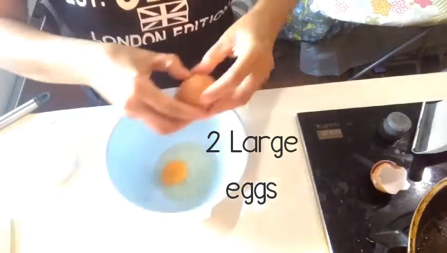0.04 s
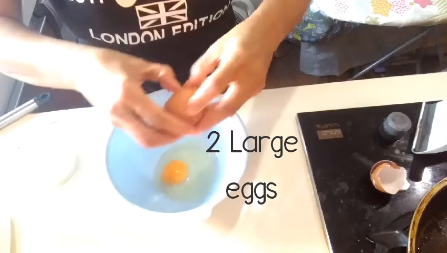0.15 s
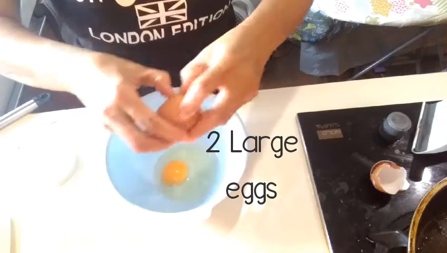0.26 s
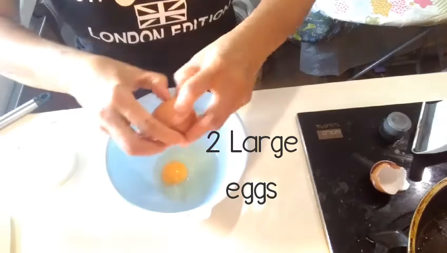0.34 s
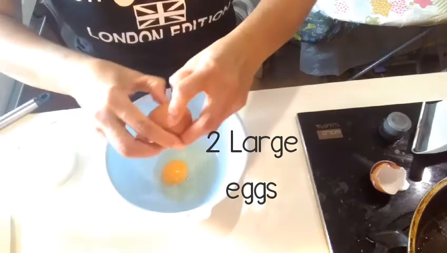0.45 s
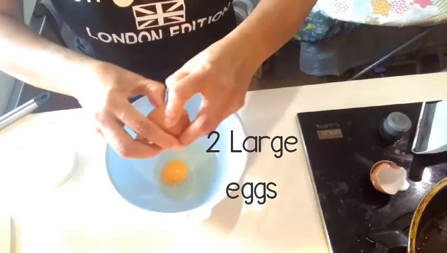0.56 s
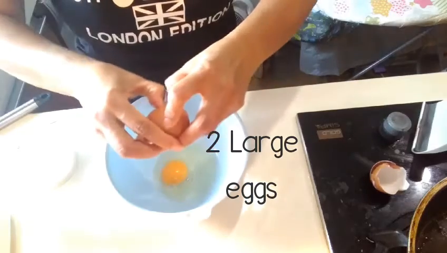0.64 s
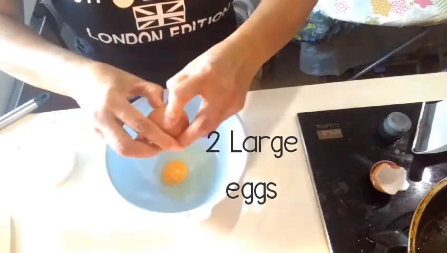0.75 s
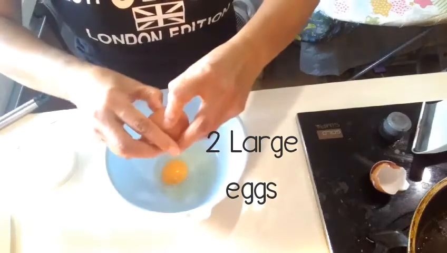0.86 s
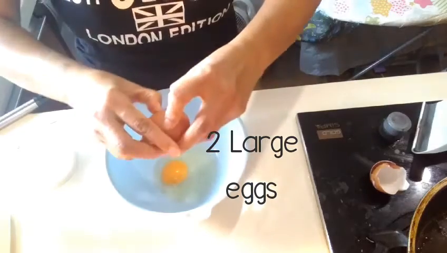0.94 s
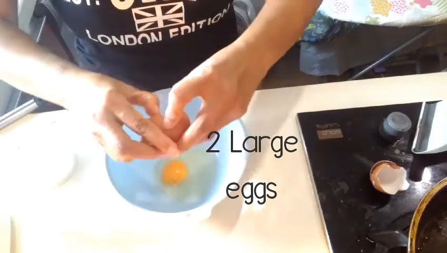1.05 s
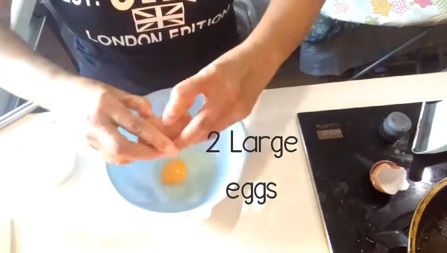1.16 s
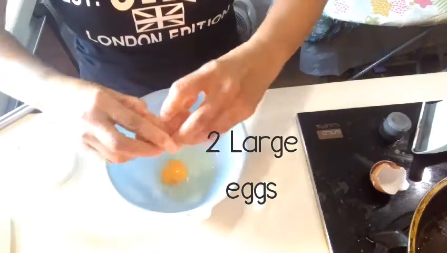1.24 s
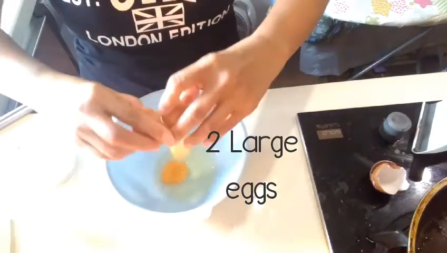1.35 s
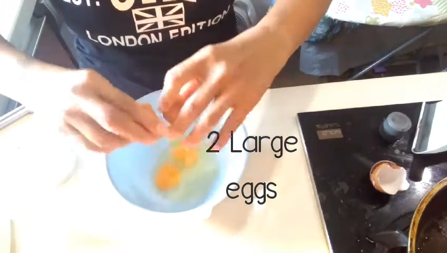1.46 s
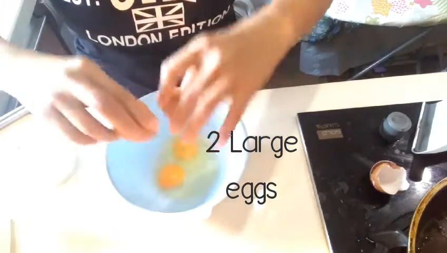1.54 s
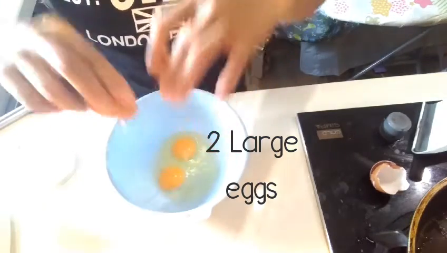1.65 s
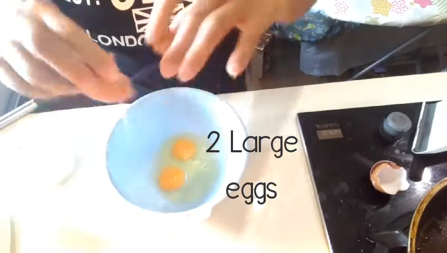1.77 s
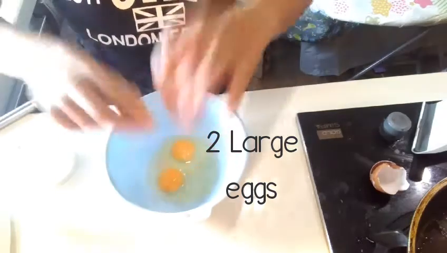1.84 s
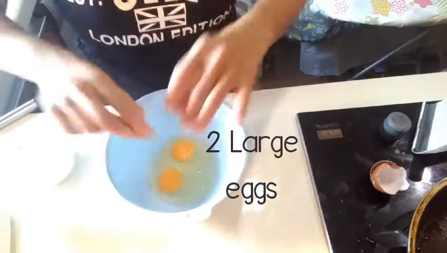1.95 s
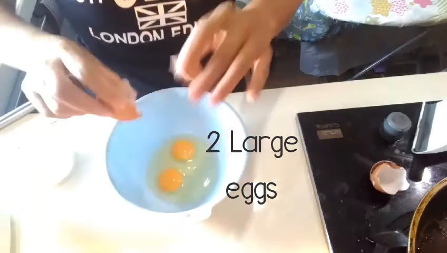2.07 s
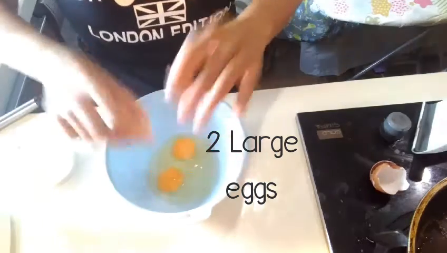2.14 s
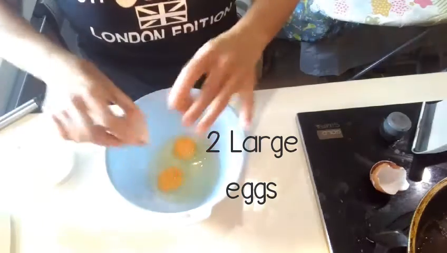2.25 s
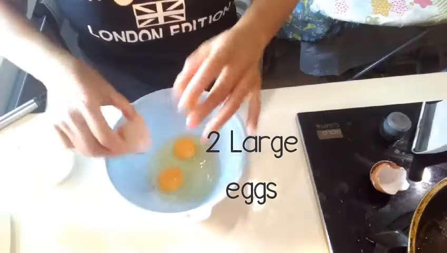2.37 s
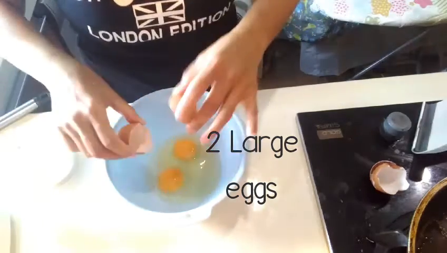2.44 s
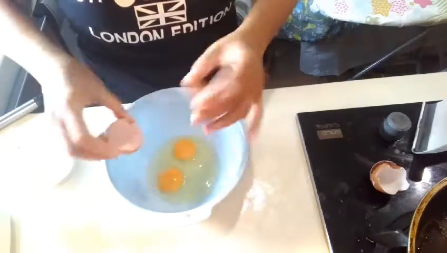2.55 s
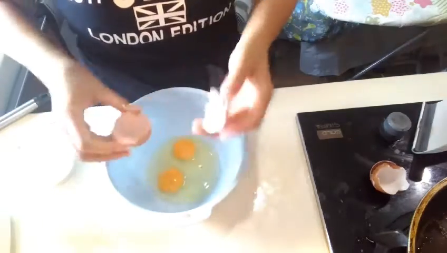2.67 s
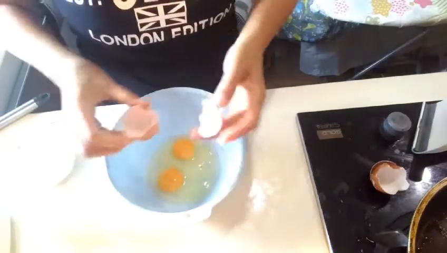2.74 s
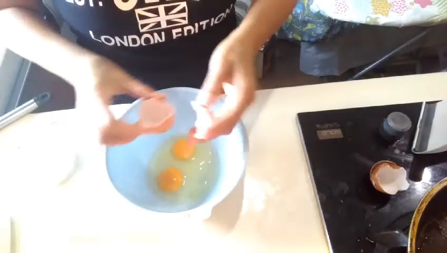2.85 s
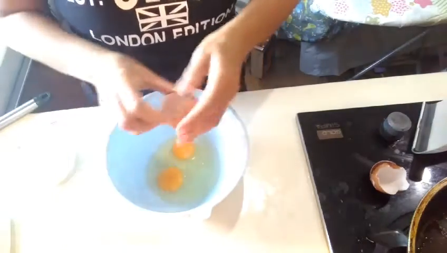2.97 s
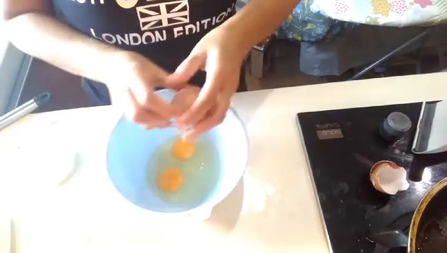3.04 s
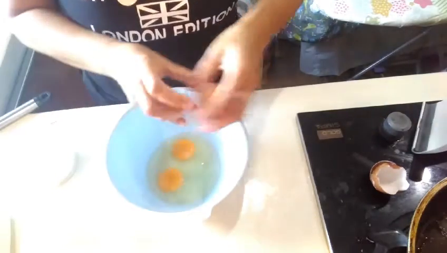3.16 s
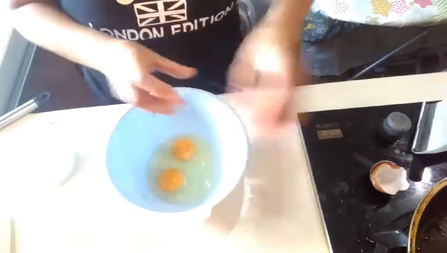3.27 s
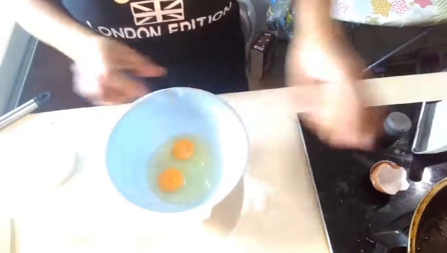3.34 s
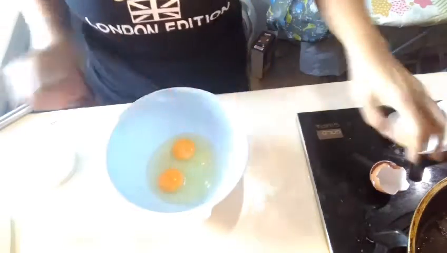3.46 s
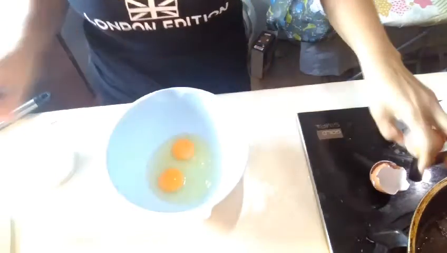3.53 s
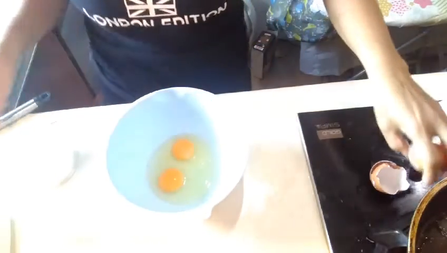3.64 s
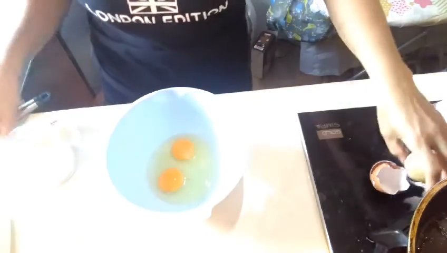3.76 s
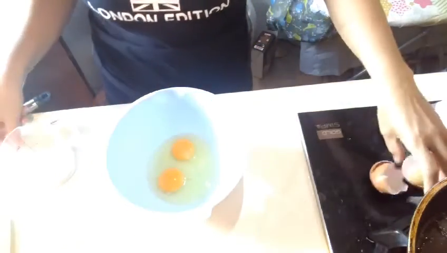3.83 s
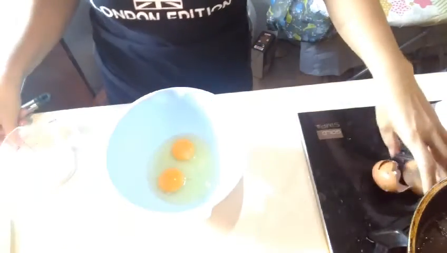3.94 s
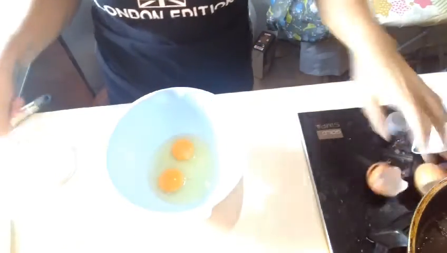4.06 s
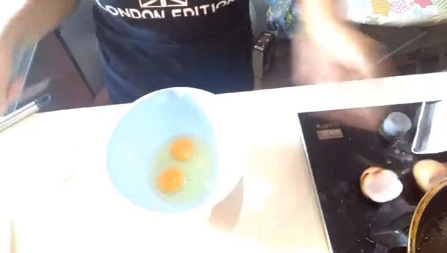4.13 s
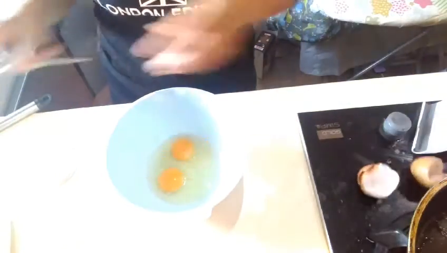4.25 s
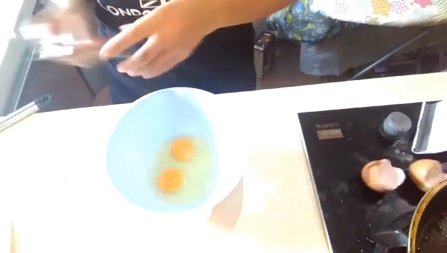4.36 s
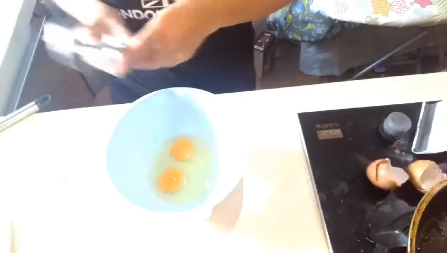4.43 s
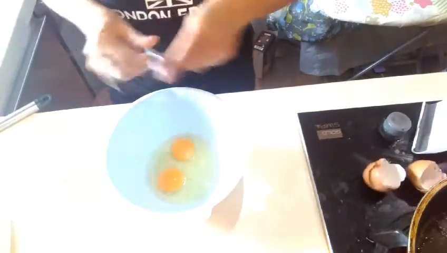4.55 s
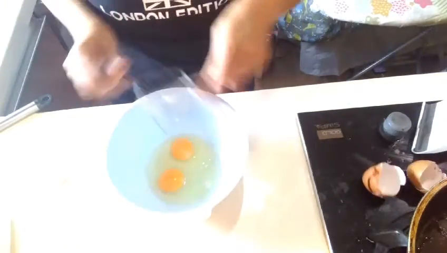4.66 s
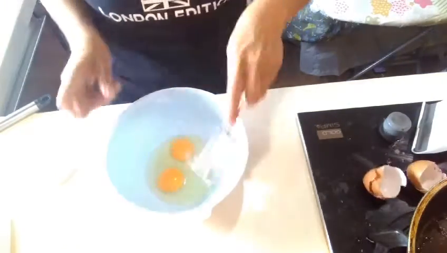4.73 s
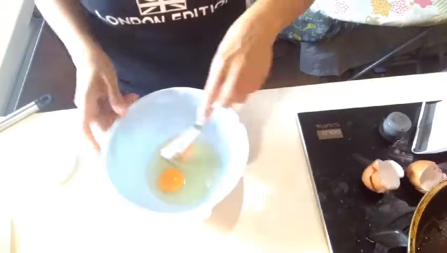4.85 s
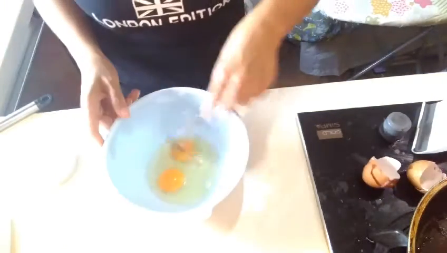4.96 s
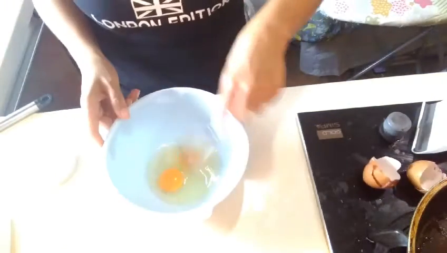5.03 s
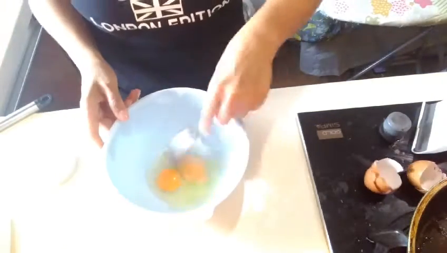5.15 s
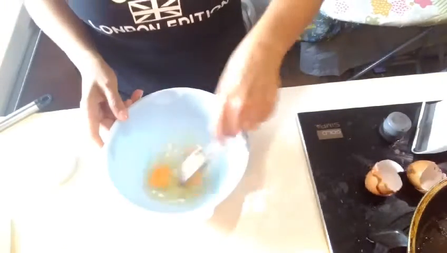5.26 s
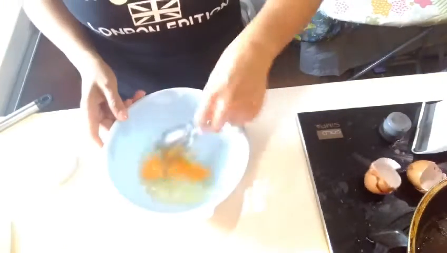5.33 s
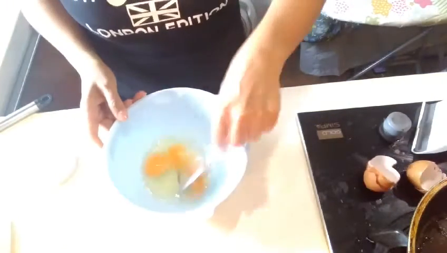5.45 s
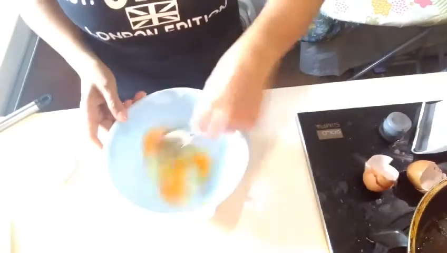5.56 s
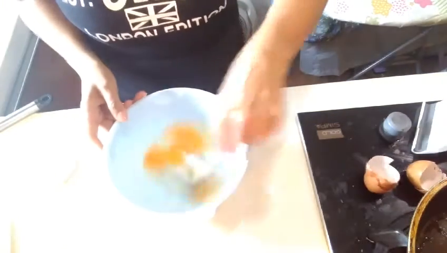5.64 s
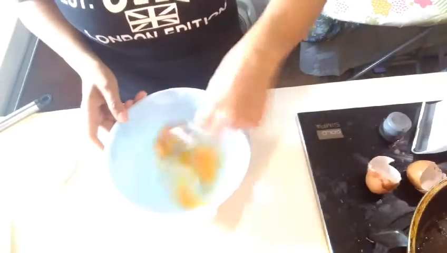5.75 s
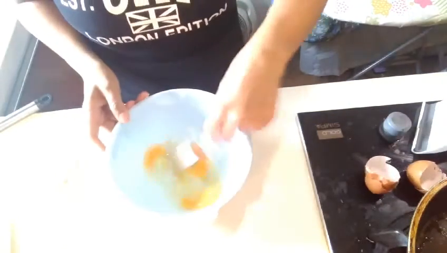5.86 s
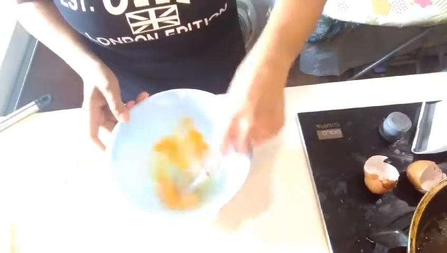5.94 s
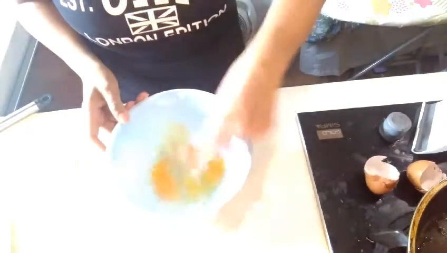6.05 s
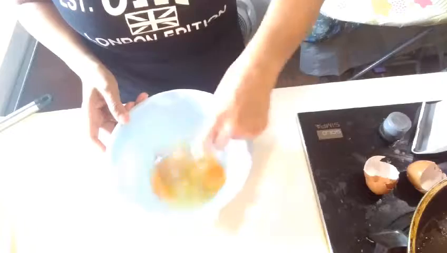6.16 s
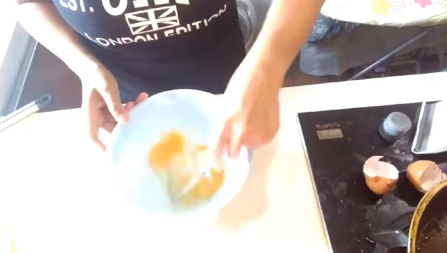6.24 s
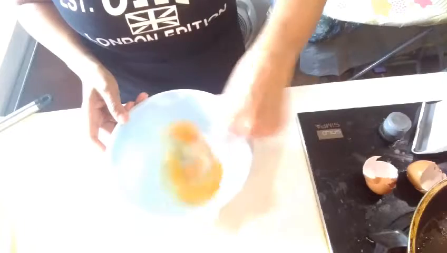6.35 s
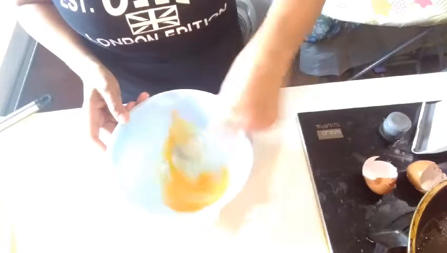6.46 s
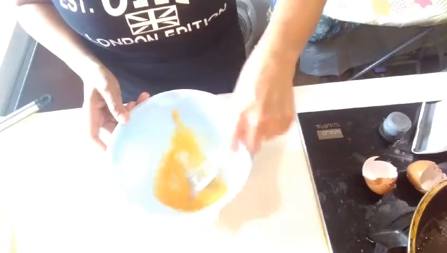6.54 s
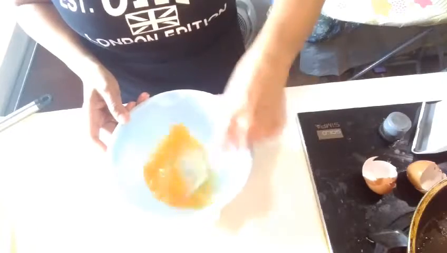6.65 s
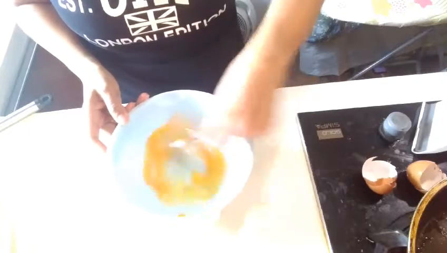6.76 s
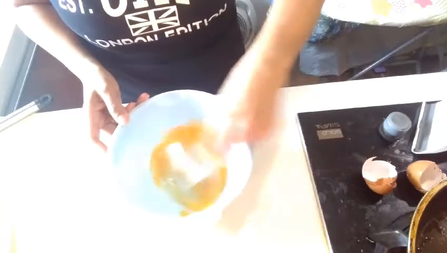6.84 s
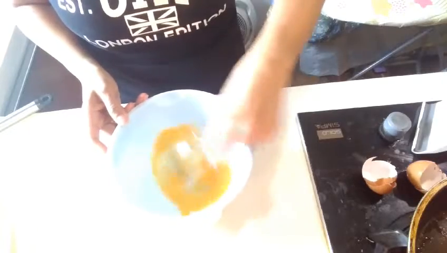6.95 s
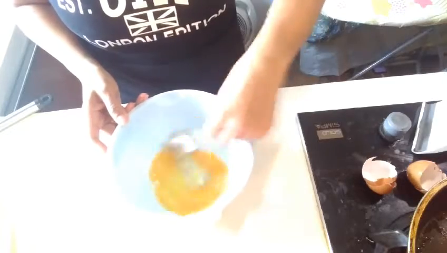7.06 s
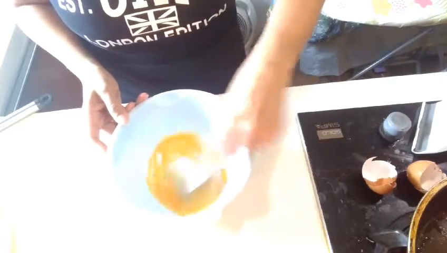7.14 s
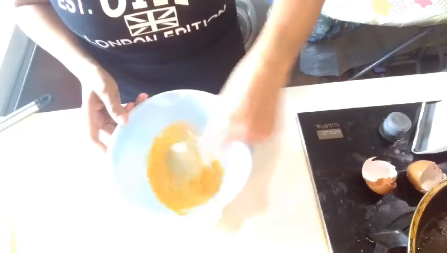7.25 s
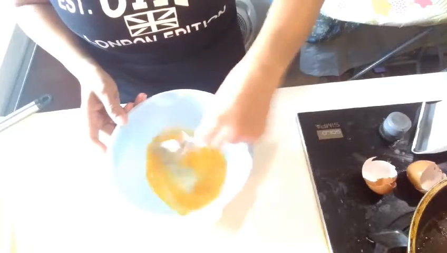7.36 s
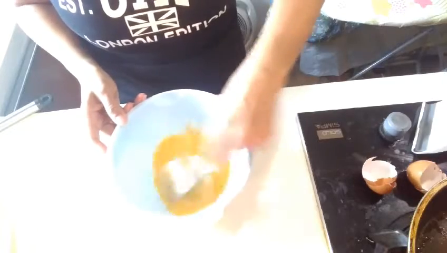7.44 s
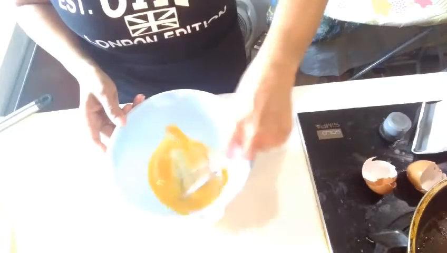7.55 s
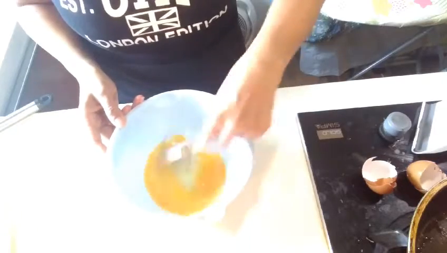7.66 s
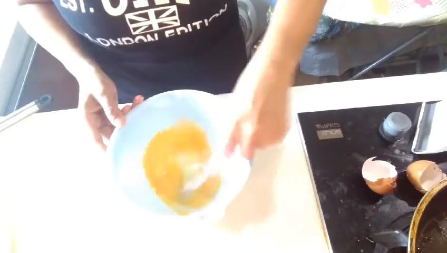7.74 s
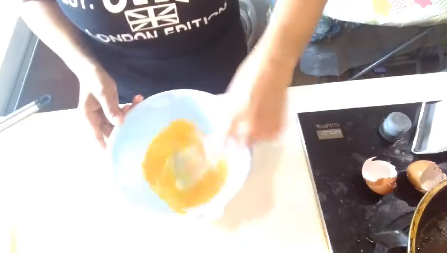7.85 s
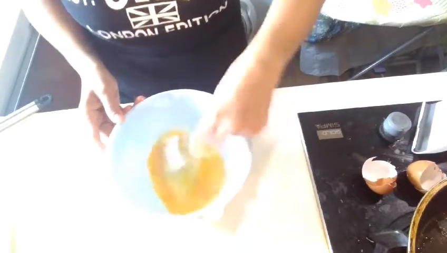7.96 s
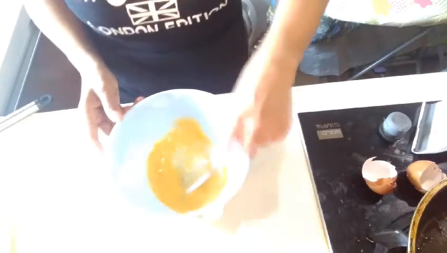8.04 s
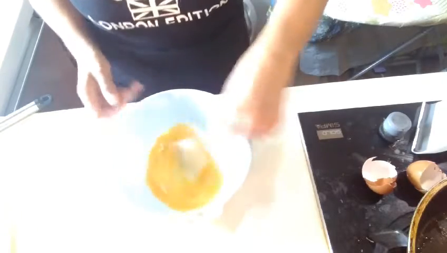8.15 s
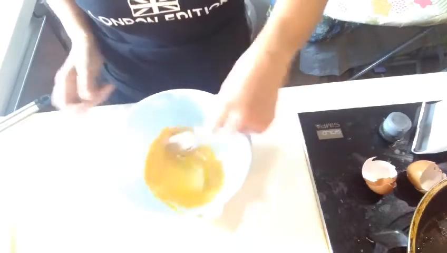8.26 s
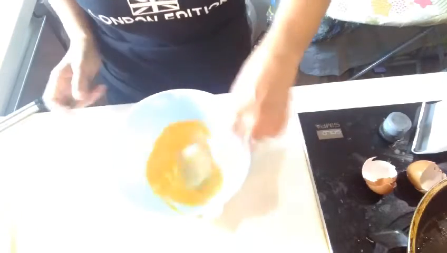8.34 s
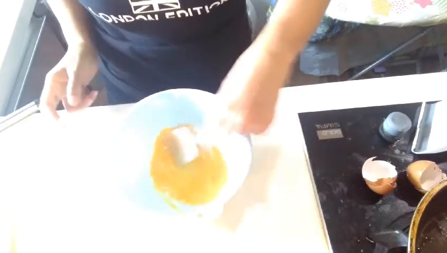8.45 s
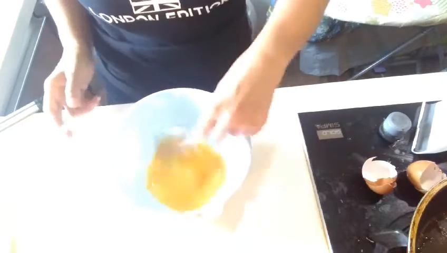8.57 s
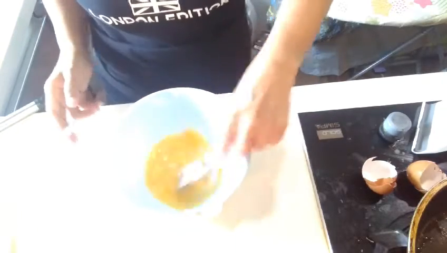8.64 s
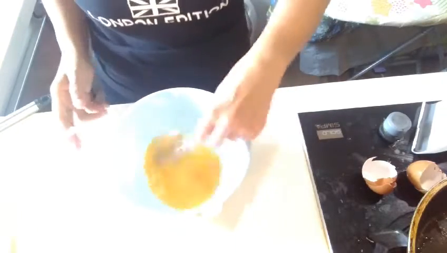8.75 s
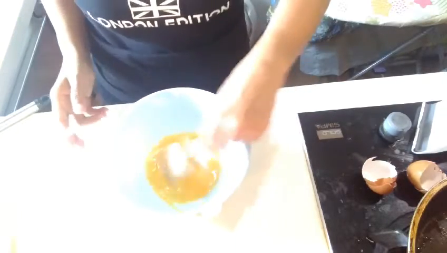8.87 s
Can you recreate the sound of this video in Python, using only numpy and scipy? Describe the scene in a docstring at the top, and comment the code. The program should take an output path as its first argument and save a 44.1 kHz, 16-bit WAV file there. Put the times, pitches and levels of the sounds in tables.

```python
"""A small kitchen, one microphone close to a plastic bowl, a fan humming far off throughout.
Half a second in, an egg cracks against the bowl; the shell is pulled apart in brittle snaps while fingers
rub on it and the sticky white pops. At five seconds something hollow clicks down on the counter and rings.
From six seconds on a fork beats the eggs, striking and scraping the bowl and stirring in small bubbles."""
import sys
import numpy as np
from scipy import signal
from scipy.fft import rfft, irfft
from scipy.io import wavfile
from scipy.ndimage import uniform_filter1d

SR = 44100
rng = np.random.default_rng(int(sys.argv[2]) if len(sys.argv) > 2 else 0)


def log_audio(samples):
    """Write samples as a 16-bit WAV file to the path given in sys.argv[1]."""
    # one column per channel
    frames = np.atleast_2d(samples).T
    # limit to full scale, then quantise
    limited = np.clip(frames, -1, 1)
    pcm = np.round(limited * 32767).astype(np.int16)
    wavfile.write(sys.argv[1], SR, pcm)


N = 392490

# The bowl's low and high modes. Each row: frequency in Hz, width in Hz, gain in dB.
BOWL_LOW = [(108.3, 10, -4.5), (176, 44, -3.5), (274, 38, -3.5), (357, 42, -2), (531, 28, -5),
            (696, 73, -1.5), (827.5, 50, 0.6)]
BOWL_HIGH = [(1095, 56, -0.5), (1397, 61, -7.5), (1586, 67, 2), (1990, 560, -4.5), (2417, 240, 1.5),
             (2656, 198, 7), (3146, 147, 5.5), (3830, 130, -2.5), (4287, 140, -3.5), (4720, 470, -17.5),
             (5550, 240, -13.5), (6570, 5100, -34)]
# The fork hits the bowl. Each row: start in seconds, then levels in dB of the high modes,
# the lowest modes, the middle modes and the tick.
FORK_HITS = [(6.123, -21.5, -39, -27.5, -31), (6.1527, -40, -36.5, -33, -58), (6.2694, -42, -56, -47, -65),
             (6.2846, -30, -46, -40.5, -49), (6.392, -35, -57, -52, -52), (6.4674, -36, -57, -50, -50),
             (6.4811, -35, -61, -56, -28.5), (6.568, -30, -56, -58, -53), (6.6712, -31, -42, -44, -54),
             (6.7287, -38, -43, -45, -52), (6.7861, -32.5, -61, -47, -49), (6.9005, -33, -50, -53, -34.5),
             (6.9239, -21, -26.5, -28, -36), (6.977, -31, -36, -30.5, -30), (7.0267, -27, -26, -22.5, -40),
             (7.07, -31, -49, -26.5, -44), (7.125, -25.5, -34, -39, -50), (7.1649, -39, -50, -43, -34),
             (7.2196, -31, -32.5, -31, -43), (7.2664, -26, -56, -44, -39), (7.296, -21, -42, -26.5, -49),
             (7.3353, -25, -31, -33, -43), (7.4068, -29, -31, -32, -44), (7.5013, -28, -44, -37, -40),
             (7.5647, -25, -58, -60, -44), (7.6065, -25.5, -29.5, -30.5, -52), (7.64, -29, -37, -33, -43),
             (7.7038, -25.5, -37.5, -39, -49), (7.7747, -32, -52, -58, -39), (7.8302, -34, -36, -43, -60),
             (7.8478, -43, -52, -56, -50), (7.8979, -21, -34.5, -26.5, -34), (7.9628, -38, -46, -45, -27),
             (7.9918, -22, -31.5, -28, -36), (8.0524, -19.5, -36, -28, -38), (8.0992, -18.5, -36, -27, -38),
             (8.1403, -23, -36.5, -45, -48), (8.199, -30, -32.5, -28.5, -37),
             (8.3072, -33, -51, -39.5, -56), (8.3454, -21.5, -44, -34.5, -32), (8.428, -41, -37, -41, -54),
             (8.45, -32, -46, -43, -48), (8.5061, -23, -34, -28.5, -30), (8.5485, -34, -37.5, -31.5, -54),
             (8.6269, -28.5, -32, -31.5, -45), (8.6551, -27.5, -29.5, -35, -45),
             (8.6903, -34, -42, -38, -47), (8.772, -33.5, -63, -58, -54), (8.852, -38, -38, -40, -49),
             (8.8702, -36, -45, -39.5, -54)]
# The tines sweep through the egg. Each row: middle and half length in seconds, then levels in dB
# of scrape, squelch and splash.
FORK_SWEEPS = [(6.153, 0.03, -48, -61, -70), (6.311, 0.03, -39.5, -56, -63),
               (6.394, 0.033, -50, -62, -62.5), (6.508, 0.038, -45.5, -53.5, -63),
               (6.598, 0.028, -42, -54, -53), (6.689, 0.034, -47, -54, -65),
               (6.747, 0.031, -54.5, -65, -73), (6.807, 0.029, -45.5, -44.5, -55.5),
               (6.854, 0.0094, -53, -66, -54.5), (6.939, 0.026, -42, -60, -65),
               (6.996, 0.028, -40.5, -42.5, -49), (7.041, 0.019, -40, -50, -63),
               (7.083, 0.021, -43, -48, -67), (7.135, 0.016, -39.5, -46.5, -68),
               (7.188, 0.04, -40.5, -54, -48.5), (7.263, 0.03, -42, -47, -51.5),
               (7.308, 0.018, -34.5, -52, -71), (7.358, 0.029, -39, -47, -51.5),
               (7.412, 0.043, -40, -65, -53), (7.46, 0.028, -48.5, -52, -51), (7.516, 0.027, -44, -61, -61),
               (7.57, 0.02, -45.5, -56, -63), (7.618, 0.013, -43, -56, -64), (7.652, 0.018, -40, -58, -54),
               (7.713, 0.03, -42.5, -54, -69), (7.773, 0.025, -44, -60, -60),
               (7.853, 0.016, -44.5, -52, -60), (7.915, 0.031, -42, -57, -58),
               (7.973, 0.035, -41.5, -54, -50.5), (8.062, 0.018, -44.5, -57, -60),
               (8.113, 0.017, -39.5, -48, -60), (8.156, 0.031, -41, -40, -49),
               (8.21, 0.022, -46.5, -54, -57), (8.252, 0.027, -46, -53, -65), (8.312, 0.015, -45, -69, -77),
               (8.367, 0.038, -40.5, -53.5, -52.5), (8.461, 0.023, -42.5, -51, -55),
               (8.519, 0.02, -39, -62, -58), (8.576, 0.027, -39.5, -47, -54),
               (8.66, 0.021, -42.5, -60, -63), (8.701, 0.035, -39.5, -48, -54.5),
               (8.796, 0.033, -42, -53, -55), (8.879, 0.021, -44, -54, -65)]
SWEEP_RISE = .7   # rise time as a share of the fall


def from_db(db):
    """Decibels to gain."""
    return 10 ** (np.asarray(db) / 20)


def unit_rms(x):
    """Scale to rms 1."""
    return x / np.sqrt(np.mean(x ** 2) + 1e-20)


def level_curve(rows, outside_db=None):
    """A gain for every sample, from rows of seconds and dB."""
    times, db = np.transpose(rows)
    return from_db(np.interp(np.arange(N) / SR, times, db, left=outside_db, right=outside_db))


def drift(per_s):
    """A slow random curve through points of spread 1."""
    return np.interp(np.arange(N) * per_s / SR, np.arange(900), rng.standard_normal(900))


def coloured(spectrum):
    """Smooth noise of rms 1, shaped by rows of Hz and dB."""
    points_hz, points_db = np.transpose(spectrum)
    hz = np.maximum(np.arange(N // 2 + 1) * SR / N, 1)
    shape = from_db(np.interp(np.log(hz), np.log(points_hz), points_db))
    return unit_rms(irfft(rfft(rng.standard_normal(N)) * shape, N))


def highpass(x, edge_hz):
    """Second-order high-pass."""
    return signal.sosfilt(signal.butter(2, edge_hz, "high", fs=SR, output="sos"), x)


def resonate(x, hz, width_hz):
    """Two-pole resonance, gain 1 at its peak."""
    r = np.exp(-np.pi * width_hz / SR)
    poles = [1, -2 * r * np.cos(2 * np.pi * hz / SR), r * r]
    return signal.lfilter([(1 - r * r) / 2, 0, (r * r - 1) / 2], poles, x + 1e-18)


def body(x, modes):
    """Modes ringing in parallel, signs alternating."""
    return sum((-1) ** k * from_db(db) * resonate(x, hz, width)
               for k, (hz, width, db) in enumerate(modes))


def roaming_body(excite, modes, patchy_db):
    """The contact point wanders, so each mode is driven on its own and with a changing strength."""
    return sum(from_db(db + patchy_db * drift(per_s=25)) * resonate(excite(), hz, width)
               for hz, width, db in modes)


def grains(per_s, spread_db):
    """Random clicks of uneven size; rms 1."""
    where, size, sign = rng.random((int(per_s * N / SR), 3)).T
    heights = from_db(spread_db * np.minimum(-np.log(size + 1e-9), 4)) * np.sign(sign - .5)
    return unit_rms(np.bincount((where * N).astype(int), heights, minlength=N))


def taps(times, gains, soft_hz):
    """One soft-edged click of either sign at each moment."""
    out = np.zeros(N)
    out[np.round(np.asarray(times) * SR).astype(int)] = gains * rng.choice([-1, 1], len(times))
    return signal.sosfilt(signal.butter(2, soft_hz, fs=SR, output="sos"), out + 1e-18)


def bursts(times, gains, lengths_s):
    """A short run of rough contact at each moment, rising fast and dying."""
    out, t = np.zeros(N + 2000), np.arange(2000) / SR
    for start, gain, length in np.broadcast(times, gains, lengths_s):
        puff = rng.standard_normal(len(t)) * t * np.exp(-t / (0.46 * length + 1e-4))
        out[round(start * SR):][:2000] += gain * puff / np.abs(puff).max()
    return out[:N]


def swells(middles, halves, levels_db, rise):
    """An envelope with a rounded rise and a slower fall around each moment."""
    out, t = np.zeros(N + 24000), np.arange(-12000, 12000) / SR
    for middle, half, db in zip(middles, halves, levels_db):
        shape = np.exp(-np.where(t < 0, (t / (rise * half)) ** 4, (t / half) ** 2))
        out[round(middle * SR):][:24000] += from_db(db) * shape
    return out[12000:N + 12000]


def bubbles(times, gains, pitches_hz, lengths_s, glide):
    """Small air pockets ring briefly while their pitch glides."""
    out = np.zeros(N + SR)
    for start, gain, hz, length in np.broadcast(times, gains, pitches_hz, lengths_s):
        t = np.arange(round(7 * length * SR)) / SR
        phase = 2 * np.pi * hz * t * (1 + glide * np.minimum(t / length, 2))
        out[round(start * SR):][:len(t)] += gain * np.sin(phase) * t / length * np.exp(1 - t / length)
    return out[:N]


def struck(times, levels_db, modes, spread_s, soft_hz, patchy_db):
    """Blows on a body: each mode gets its tap a little apart from the others."""
    _, width, db = np.transpose(modes)
    gains = from_db(levels_db) / np.linalg.norm(from_db(db) * 2 * np.pi * width / SR)
    excite = lambda: taps(times + spread_s * rng.random(len(times)), gains, soft_hz)
    return roaming_body(excite, modes, patchy_db)


def rubbed(modes, per_s, spread_db, patchy_db):
    """A stream of tiny contacts keeps the modes sounding; rms 1."""
    return unit_rms(roaming_body(lambda: grains(per_s, spread_db), modes, patchy_db))


def fan():
    """The far fan: smooth air noise, a few narrow resonances and a wavering low hum."""
    # Moving air. Each row: frequency in Hz, relative density in dB.
    air_spectrum = [(15, -89), (25, -49), (60, -11.5), (79, -5), (113, -14.5), (140, -5.5), (174, -12.5),
                    (436, -16), (497, -31.5), (530, -19.5), (803, -18.5), (857, -21), (2720, -25),
                    (4600, -42), (5980, -69.5), (10100, -120)]
    # Resonances. Each row: frequency in Hz, width in Hz, level in dB.
    air_tones = [(50, 8, -81.5), (144, 13, -73.5), (342, 30, -72), (524, 50, -76), (628, 15, -77.5),
                 (821, 11, -76)]
    # The hum's slow course. Each row: time in seconds, level in dB.
    hum_levels = [(0, -64.5), (1.1, -59), (2.3, -62.5), (4.3, -65.5), (4.9, -61), (5.3, -62.5),
                  (5.75, -54.5), (6.4, -62.5), (7.6, -61), (8.2, -57.5), (8.9, -61.5)]

    def narrow_noise(hz, width_hz):
        band = resonate(rng.standard_normal(N), hz, width_hz)
        return unit_rms(resonate(band, hz, width_hz))

    air = from_db(-60.5) * coloured(air_spectrum)
    tones = sum(from_db(db) * narrow_noise(hz, width) for hz, width, db in air_tones)
    hum = narrow_noise(hz=79.7, width_hz=6)
    hum /= np.abs(signal.hilbert(hum)) / np.sqrt(2) + .1   # wandering pitch, even strength
    waver = from_db(4.5 * drift(per_s=9))
    return air + tones + level_curve(hum_levels) * waver * hum


def kitchen(x, t60_s=.24, gap_s=.0021, wall_cut_hz=10000):
    """Close walls: dense reflections after a short gap, dying evenly, a little dull."""
    t = np.arange(SR // 2) / SR
    onset = np.clip((t - gap_s) / .002, 0, 1)
    spectrum = rfft(rng.standard_normal(len(t)) * from_db(-60 * t / t60_s) * onset)
    spectrum /= np.sqrt(uniform_filter1d(np.abs(spectrum) ** 2, size=60))   # even out the colour
    tail = irfft(spectrum)[:SR // 3]
    tail = signal.lfilter([1], [1, -np.exp(-2 * np.pi * wall_cut_hz / SR)], tail)
    return signal.fftconvolve(x, tail / np.linalg.norm(tail))[:N]


def counter_knock():
    """Something hollow meets the counter: one blow rings its modes."""
    # Each row: frequency in Hz, width in Hz, gain in dB.
    hollow_modes = [(392, 240, -14.5), (721, 25, -5.5), (1260, 110, -25), (1535, 37, 2), (1620, 64, 0),
                    (1820, 78, 7), (1810, 55, -2), (1980, 70, -0.5), (2130, 43, 1), (2265, 63, 1.5),
                    (2460, 67, 2), (2520, 82, 1.5), (2990, 160, -6.5), (3260, 130, -8), (3600, 400, -13),
                    (5030, 600, -21)]
    return body(taps([5.017], from_db(14), soft_hz=5020), hollow_modes)


def snaps_and_clicks():
    """The shell snaps, the hollow object clicks on the counter: each a bright burst and a duller ring."""
    # Each row: start in seconds, burst and ring levels in dB, length in seconds.
    # The four rows from 5.0 to 5.3 s are the hard clicks of the hollow object being set down.
    contacts = [(0.42, -55.5, -49, 0.0035), (0.5056, -15, -15, .004), (1.37, -63, -59, .0046),
                (1.4313, -40, -43.5, 0.0044), (1.524, -54, -46, 0.0046), (1.571, -54, -50, 0.0053),
                (1.73, -55, -54, .0058), (1.774, -35, -33.5, .0041), (1.918, -49, -49, .0033),
                (1.928, -27.5, -39, .0037), (2.036, -46, -41, 0.0057), (2.16, -55, -44, 0.0035),
                (2.221, -47, -45, .0038), (2.239, -43.5, -51, .0045), (2.2902, -34.5, -40, 0.0035),
                (2.331, -42, -35, .006), (2.424, -36, -40, .0042), (2.498, -45.5, -48, 0.0041),
                (2.6984, -42, -37.5, .0062), (2.771, -45, -43.5, .0061), (2.795, -44, -30, .0061),
                (2.855, -51, -56, .0045), (3.236, -71, -53, 0.0048), (4.085, -34.5, -32, .0054),
                (4.129, -35, -38, 0.011), (4.151, -43, -41, .0037), (5.003, -33, -30, .012),
                (5.016, -23.5, -12.5, .0085), (5.109, -36, -24, 0.016), (5.2927, -40.5, -39, .015),
                (5.66, -61, -58, .0047)]
    # Each row: frequency in Hz, width in Hz, gain in dB.
    ring_modes = [(343, 110, -11), (750, 250, 1.5), (1440, 1400, 4.5), (2100, 700, 4), (3100, 600, 5.5),
                  (3920, 350, 2.5), (5810, 650, -8)]
    starts, burst_db, ring_db, lengths = np.transpose(contacts)
    burst = highpass(bursts(starts, from_db(burst_db), lengths), edge_hz=8200)
    return burst + struck(starts, ring_db, ring_modes, spread_s=lengths, soft_hz=9000, patchy_db=2.5)


def egg_opening():
    """The egg taps the bowl as it breaks, fingers rub on the shell and the sticky white pops as it parts."""
    # Each row: middle and half length in seconds, level in dB.
    rubs = [(1.53, .12, -76), (2.0, 0.19, -81), (2.37, 0.1, -63), (2.76, 0.085, -75), (4.22, 0.12, -79),
            (4.95, .06, -85), (5.66, .11, -80)]
    # Each row: start in seconds, peak in dB, pitch in Hz.
    white_pops = [(1.777, -49, 1640), (2.2588, -61, 3130), (2.307, -62, 1260), (2.321, -56, 4430),
                  (2.34, -56, 2600), (2.355, -52, 3170), (2.372, -53, 3340), (2.4009, -57, 2690),
                  (2.43, -59, 1870), (2.723, -58, 1790), (2.793, -51, 1940), (2.83, -54, 2000),
                  (4.0857, -56, 1620), (4.1245, -61, 3150), (4.1394, -51, 3780)]
    bowl_tap = body(taps([.507], gains=1.0, soft_hz=2000), BOWL_LOW)
    friction = unit_rms(highpass(grains(per_s=6000, spread_db=6), edge_hz=9700))
    rubbing = swells(*np.transpose(rubs), rise=.95) * friction
    starts, pop_db, pop_hz = np.transpose(white_pops)
    pops = bubbles(starts, from_db(pop_db), pop_hz, lengths_s=.0013, glide=-.038)
    return bowl_tap + rubbing + pops


def chatter(times, blow_db, decay_s=.015):
    """The envelope of the bowl chattering on: it jumps up at each blow and dies away."""
    kicks = np.bincount(np.round(times * SR).astype(int), from_db(blow_db - 13), minlength=N)
    return signal.lfilter([1], [1, -np.exp(-1 / (decay_s * SR))], kicks + 1e-18)


def bowl_rumble(sweep_share=.73):
    """The bowl's low modes rumble as the fork bears on it and chatter after each blow."""
    # How hard the fork bears down. Each row: time in seconds, level in dB.
    pressure = [(6.1, -54.5), (6.29, -56), (6.72, -62), (6.94, -50), (7.14, -45.5), (7.47, -54),
                (7.73, -50), (8.03, -46.5), (8.9, -57)]
    starts, _, lowest_db, middle_db, _ = np.transpose(FORK_HITS)
    middles, halves, *_ = np.transpose(FORK_SWEEPS)
    sweeping = swells(middles, halves, np.zeros_like(halves), SWEEP_RISE)
    rumble = level_curve(pressure, outside_db=-140) * (1 - sweep_share + sweep_share * sweeping)
    lowest = rubbed(BOWL_LOW[:4], per_s=800, spread_db=1.8, patchy_db=6.5)
    middle = rubbed(BOWL_LOW[4:], per_s=800, spread_db=1.9, patchy_db=5)
    return (rumble + chatter(starts, lowest_db)) * lowest + (rumble + chatter(starts, middle_db)) * middle


def fork_sweeps():
    """Each sweep scrapes the bowl, squeezes egg between the tines and stirs air in."""
    middles, halves, *levels_db = np.transpose(FORK_SWEEPS)
    drag, squeeze, splash = (swells(middles, halves, db, SWEEP_RISE) for db in levels_db)
    scrape = rubbed(BOWL_HIGH[:7], per_s=3000, spread_db=2.3, patchy_db=4)
    squelch = rubbed(BOWL_HIGH[7:], per_s=1500, spread_db=2.8, patchy_db=4)
    droplets = from_db(2.8 * drift(per_s=60)) * grains(per_s=3000, spread_db=0)
    spatter = unit_rms(highpass(droplets, edge_hz=5400))
    when, pitch, size = rng.random((500, 3)).T
    first_hit_s = FORK_HITS[0][0]
    born = first_hit_s + when * (N / SR - first_hit_s)
    froth_hz, spray_hz = 800 * 6.0 ** pitch, 4500 * 2.9 ** pitch   # spray: the finest air pockets
    froth = bubbles(born, from_db(3.4 * size - 5.5), froth_hz, 4.5 / froth_hz, glide=.12)
    spray = bubbles(born[::-1], from_db(7.6 * size + .5), spray_hz, 8.4 / spray_hz, glide=.049)
    return drag * (scrape + froth) + squeeze * squelch + splash * (spatter + spray)


def fork_strikes():
    """Each blow of the fork gives a bright tick and rings the plastic bowl."""
    starts, high_db, lowest_db, middle_db, tick_db = np.transpose(FORK_HITS)
    lowest = struck(starts, lowest_db, BOWL_LOW[:4], spread_s=.0036, soft_hz=1500, patchy_db=4.5)
    middle = struck(starts, middle_db, BOWL_LOW[4:], spread_s=.00311, soft_hz=3500, patchy_db=3)
    high = struck(starts, high_db, BOWL_HIGH, spread_s=.004, soft_hz=9100, patchy_db=2.5)
    tick = highpass(bursts(starts, from_db(tick_db), lengths_s=.003), edge_hz=8800)
    return lowest + middle + high + tick


def scene():
    """Egg, knock and fork close to the microphone, with the room behind them and the fan far off."""
    handling, knock = snaps_and_clicks() + egg_opening(), counter_knock()
    beating = fork_strikes() + bowl_rumble() + fork_sweeps()
    room = kitchen(from_db(-3) * handling + from_db(-2) * knock + from_db(-10) * beating)
    near = highpass(handling + knock + beating + room, edge_hz=56)
    port_ring = (from_db(4.5) - 1) * resonate(near, hz=12300, width_hz=1500)   # the microphone's port
    return (near + port_ring + fan())[None]


def record(dry, cutoff_hz=14500):
    """The microphone hisses faintly; the top is cut steeply."""
    # Each row: frequency in Hz, relative density in dB.
    hiss_spectrum = [(2350, -26), (4000, 2.5), (4170, -23.5), (4690, -10), (7400, -14), (11900, -15.5),
                     (14200, -21)]
    hiss = from_db(-82) * coloured(hiss_spectrum)
    return signal.sosfilt(signal.cheby2(20, 45, cutoff_hz, fs=SR, output="sos"), dry + hiss)


dry = scene()
out = record(dry)
log_audio(out)
```